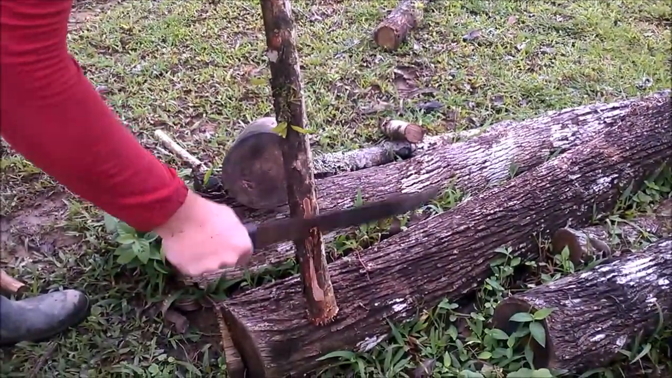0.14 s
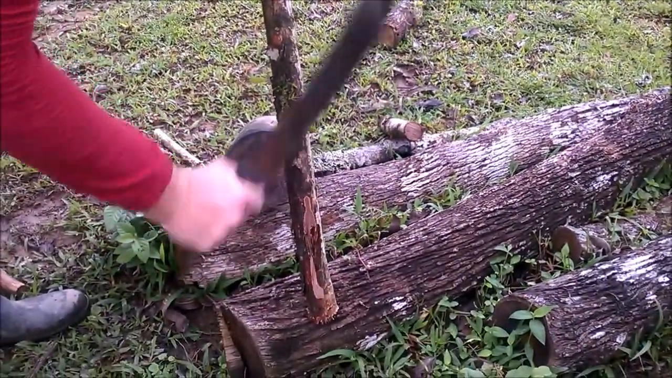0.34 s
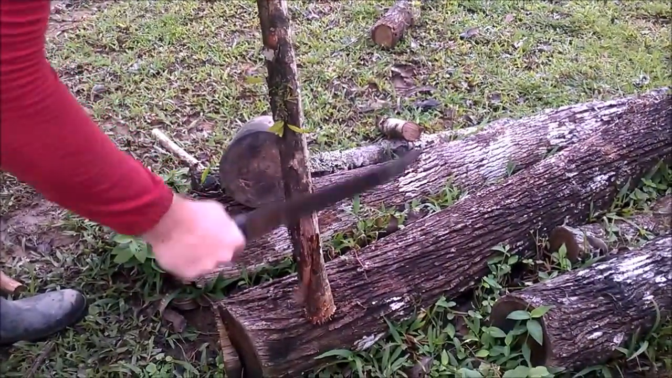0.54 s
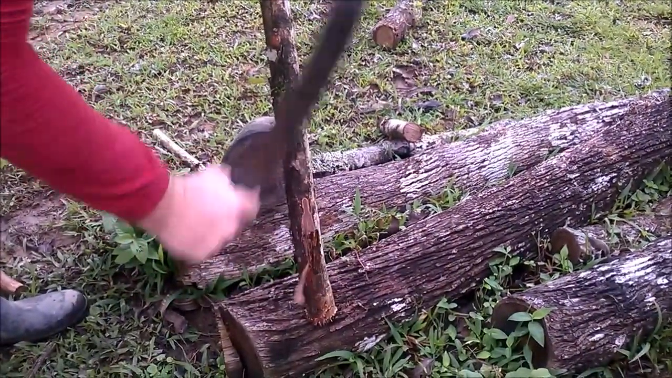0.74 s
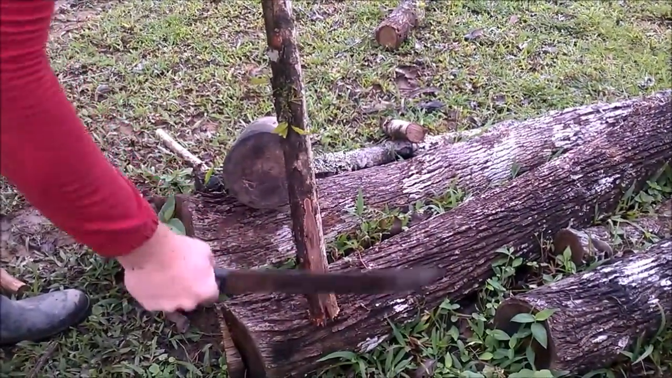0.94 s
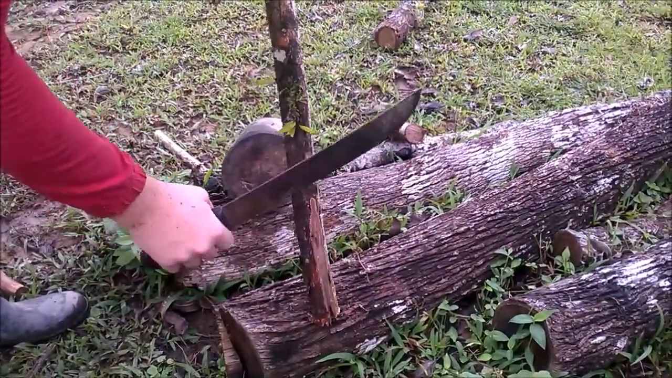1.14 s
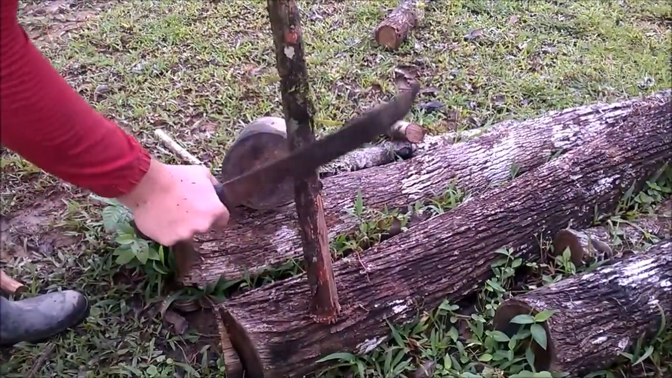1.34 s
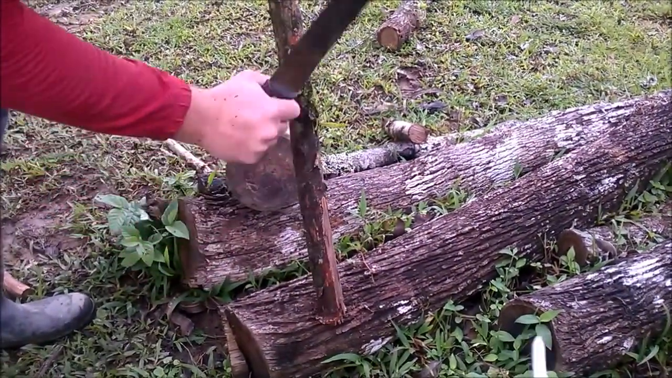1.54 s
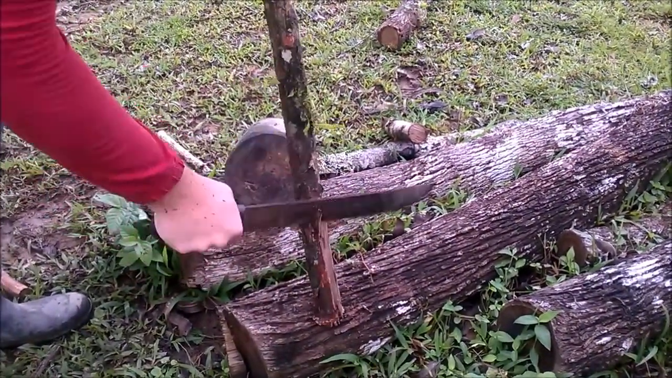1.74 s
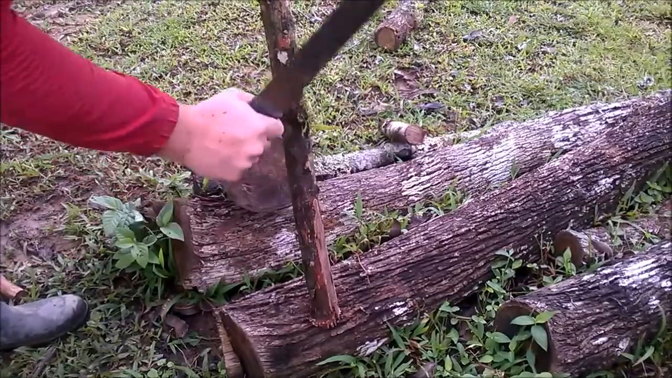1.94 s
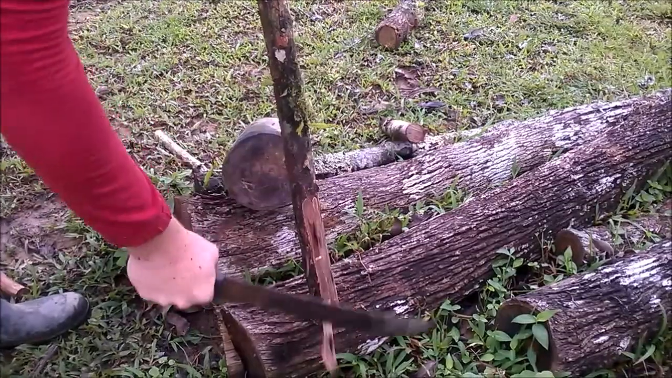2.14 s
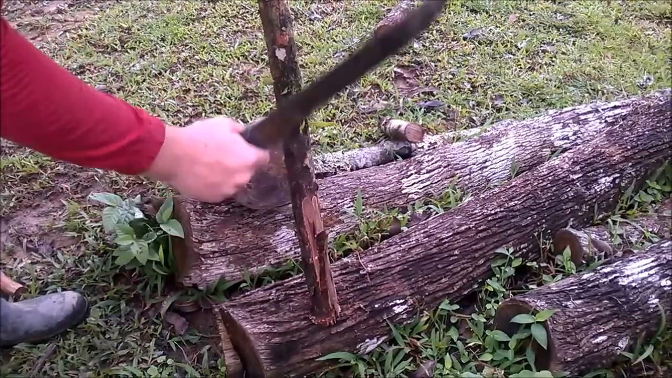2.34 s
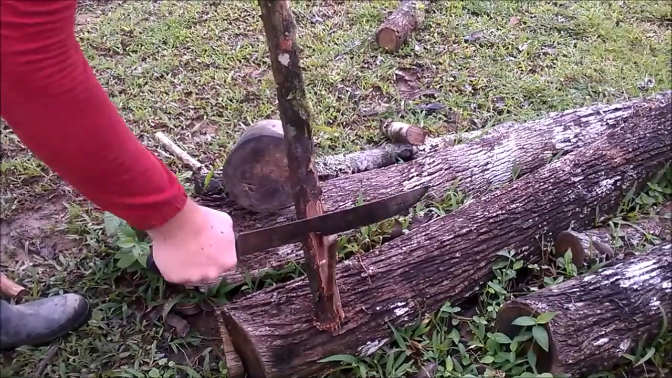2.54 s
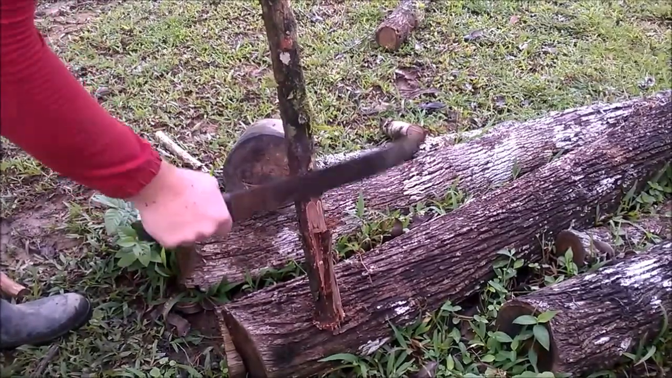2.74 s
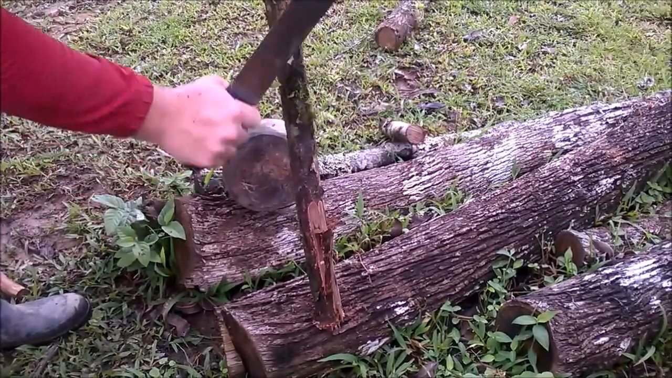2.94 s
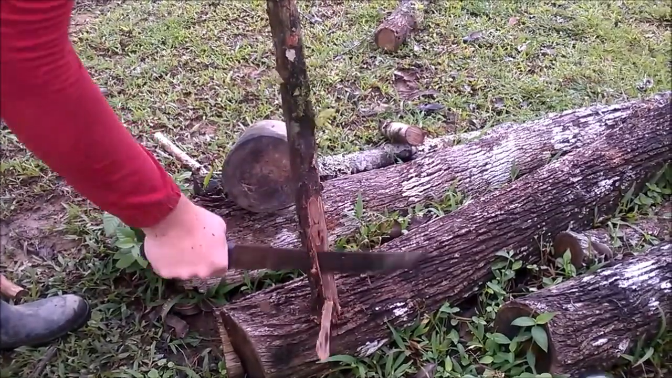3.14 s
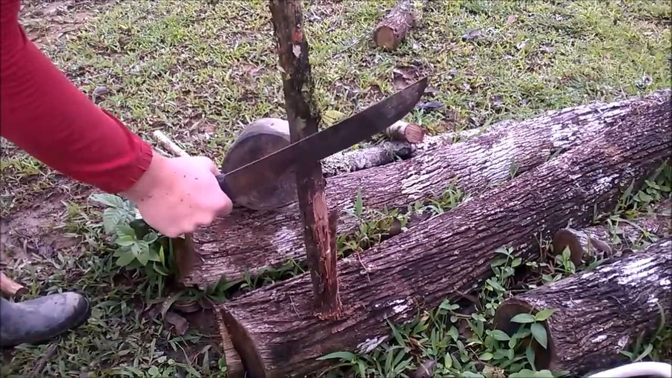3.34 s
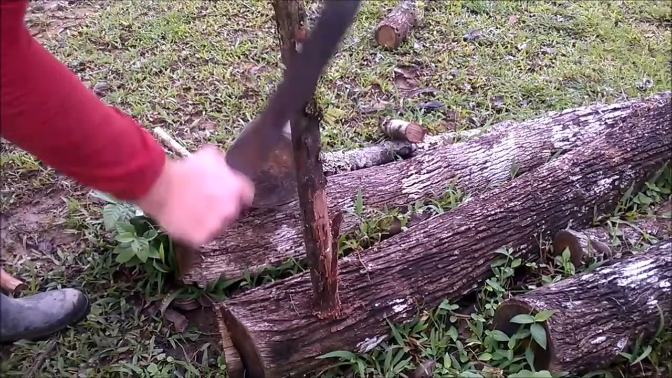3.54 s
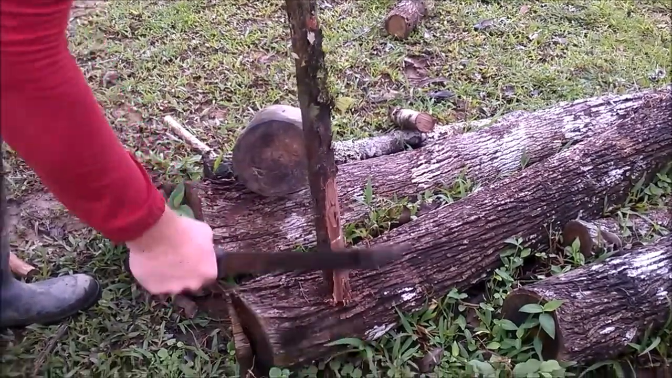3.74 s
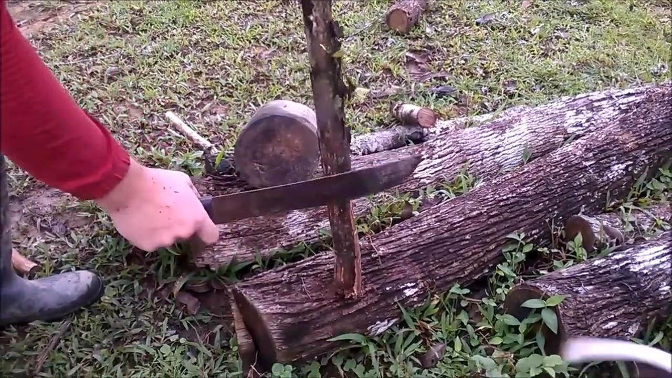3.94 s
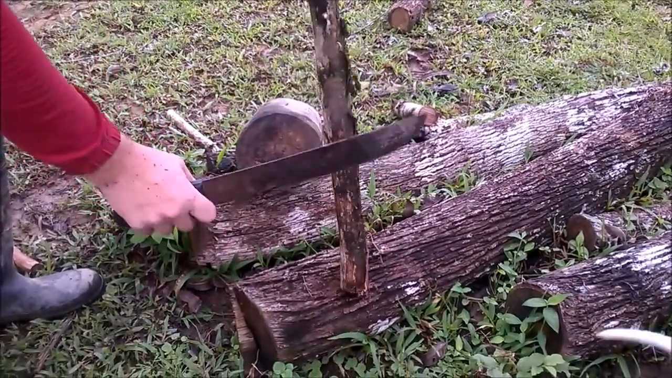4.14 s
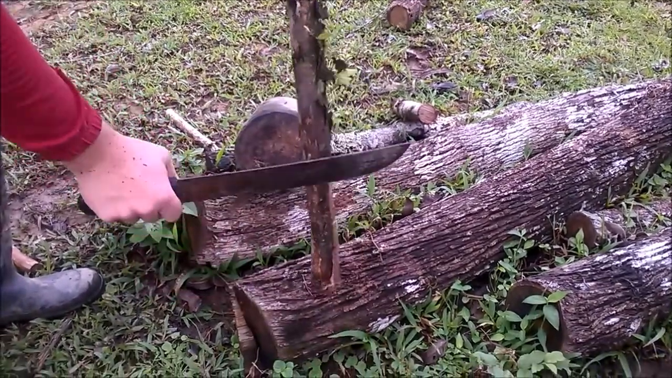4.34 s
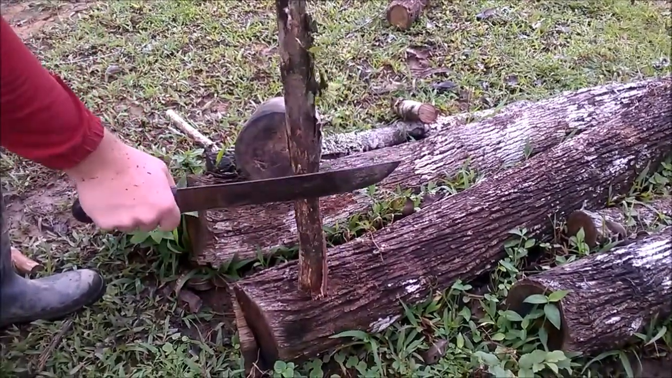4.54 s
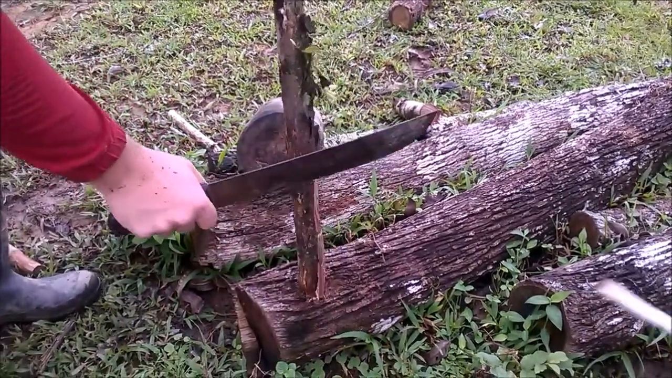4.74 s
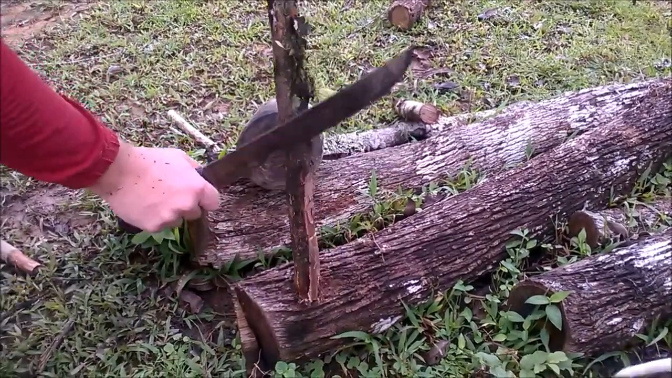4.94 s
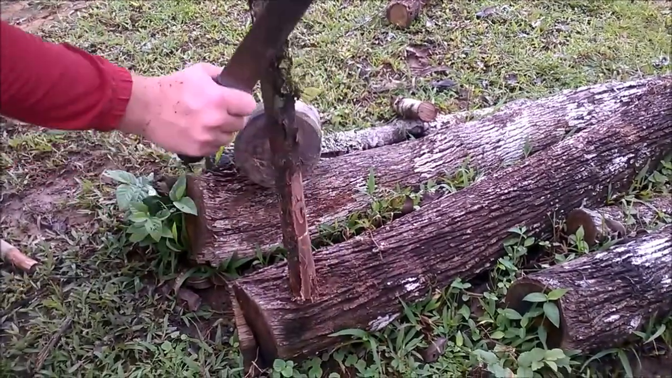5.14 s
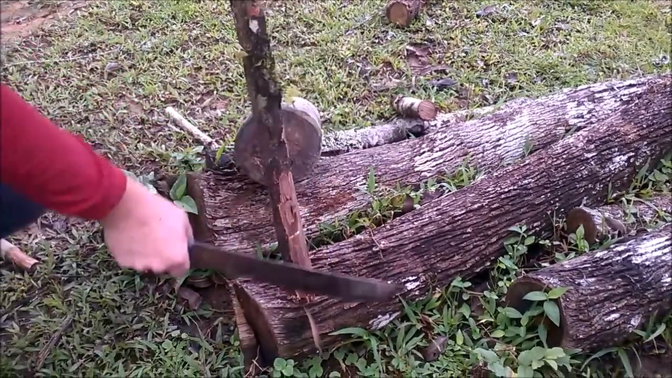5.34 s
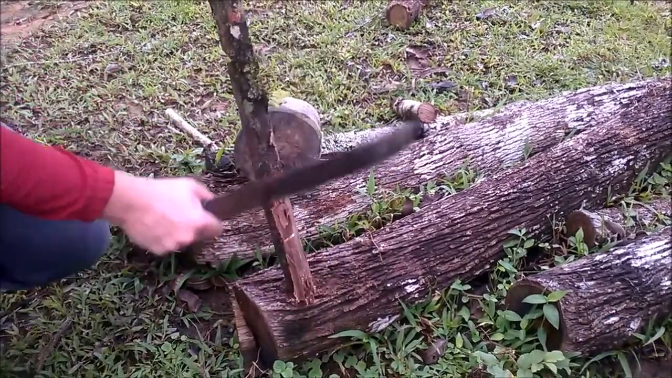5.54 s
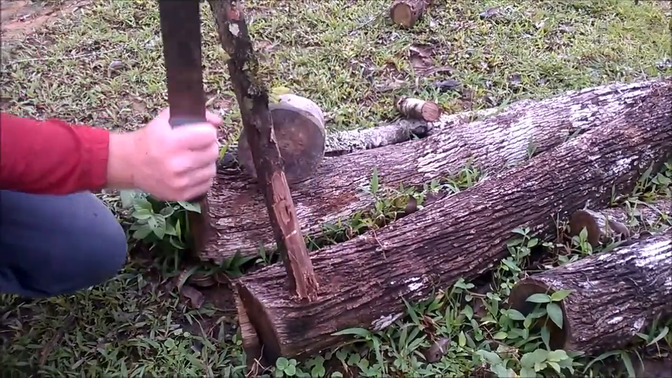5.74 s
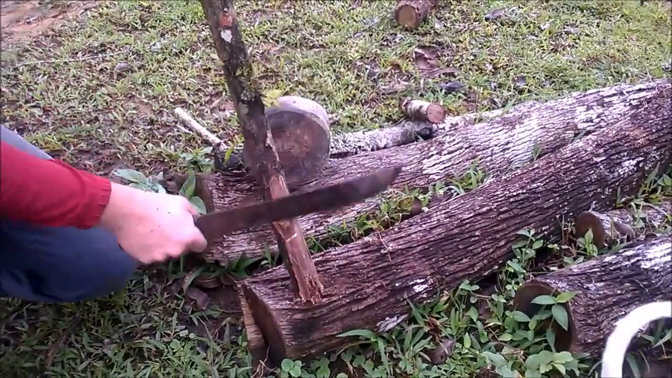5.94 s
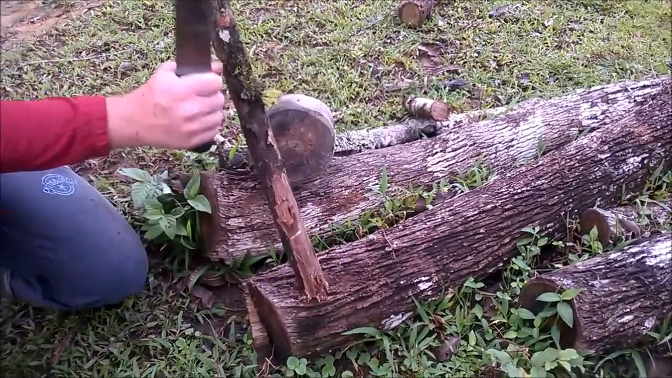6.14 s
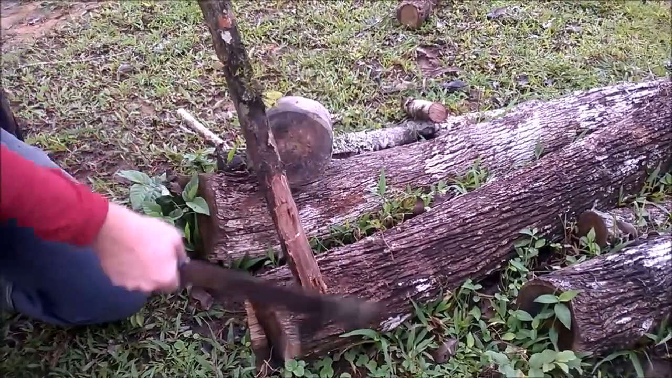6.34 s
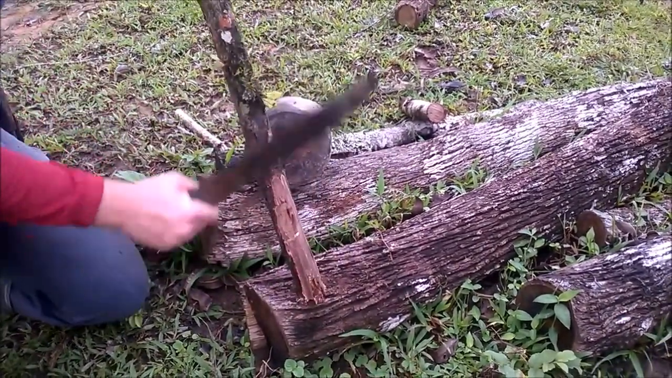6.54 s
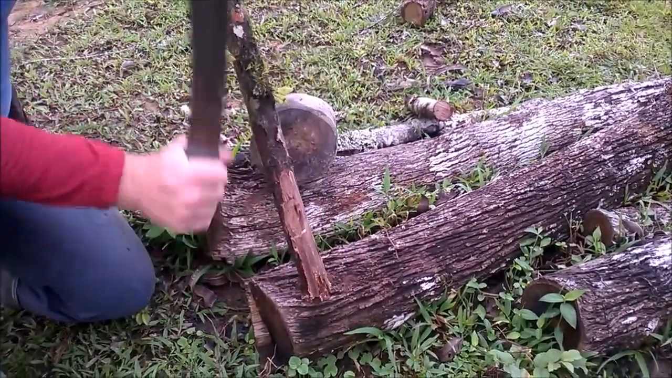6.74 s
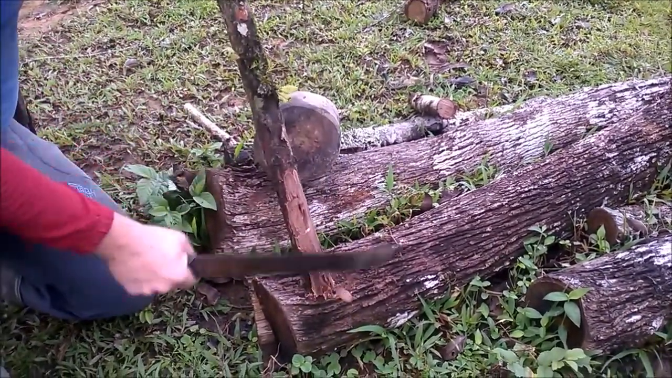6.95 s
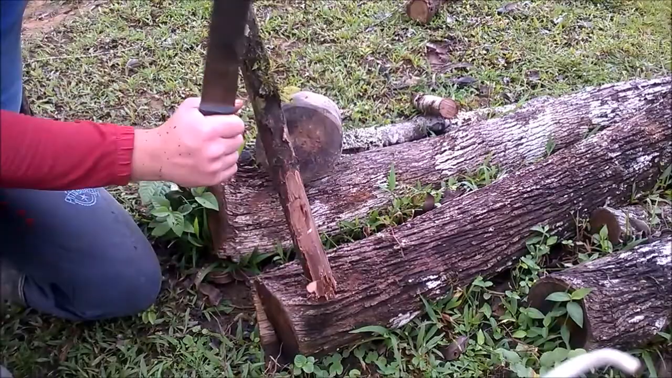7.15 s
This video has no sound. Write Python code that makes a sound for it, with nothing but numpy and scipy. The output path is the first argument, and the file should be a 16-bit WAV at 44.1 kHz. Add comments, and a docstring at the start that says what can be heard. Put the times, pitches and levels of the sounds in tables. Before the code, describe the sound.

Twelve bright, dry chops of a blade into green wood, each with a sharp crack, tearing fibres and a small low thud. Some leave a short high metallic ring. Midway the blows grow weaker and rougher, then stop while sleeves and grass rustle; strong chopping returns. Close outdoor sound with no room echo, slightly clipped peaks, soft insect hiss, faint whistles and low rumble.

```python
"""In a field, close to a small microphone, a machete chops a thin green pole held upright on a log.
Blows are noise bursts through wood and steel resonances, with snapping fibres and a low thud;
the freed blade rings as decaying sines, chips are small cracks, the pole's foot bumps with sagging sines.
Shaped noise makes the rustle of sleeves and grass, the faint whistles, the insects and the low far rumble."""
import sys
import numpy as np
from scipy import signal
from scipy.io import wavfile
from scipy.ndimage import uniform_filter1d

SR = 44100
rng = np.random.default_rng(int(sys.argv[2]) if len(sys.argv) > 2 else 0)


def put_to_file(sound):
    """Save the sound as 16-bit audio at rate SR, in the file named by the first command-line argument."""
    columns = np.atleast_2d(sound).T  # one column per channel
    safe = np.clip(columns, -1, 1)
    whole_steps = np.round(safe * 32767)
    wavfile.write(sys.argv[1], SR, whole_steps.astype(np.int16))


N = 317520  # samples, 7.2 s
GRID = np.fft.rfftfreq(4096, 1 / SR)  # Hz, frequencies at which filters are drawn

# Blows of the edge: start_s, level_db (loudest 2 ms, rms), blade_hz, wood_hz, wood_db, treble_db, low_db,
# thud_db, crack_t60_s, tear_db, knock_hz, knock_db, crumbs_db (per band)
BLOWS = [(0.1144, -8.5, 2820, 2040, 6, -3, -1.5, -37, 0.024, -19, 1160, 4, -64.5),
         (0.4677, -4.5, 3240, 2550, 5, -1, 2.5, -38.5, 0.024, -19, 1644, -2.5, -66.5),
         (0.8683, -4, 3660, 1627, 6, -1.5, 3, -34.5, 0.03, -18, 2540, 9, -72.5),
         (1.728, -16.5, 3100, 1160, 0, 3, 6.5, -38.5, 0.055, -17, 2000, 6.5, -81.5),
         (2.1153, -13.5, 3100, 2730, 15.5, -0.5, 2, -35.5, 0.035, -6.5, 1140, -2.5, -66.5),
         (2.568, -11, 3230, 2670, 13, 1, 9, -31.5, 0.011, -18, 1385, -2, -75),
         (3.1139, -11, 3070, 3212, 28, 0, 4, -40.5, 0.052, -9.5, 1650, 10.5, -64.5),
         (3.668, -19.5, 2780, 1652, 13, -10, -12, -31.5, 0.095, -13, 1142, 8.5, -63),
         (5.376, -15.5, 3160, 2350, 7.5, 0, 13.5, -38.5, 0.054, -19, 1110, 7.5, -57),
         (5.9318, -5.5, 3400, 3860, 10, -2.5, 6.5, -31, 0.038, -25.5, 1487, 14.5, -63),
         (6.3887, -6.5, 3230, 2720, -5, -0.5, 3, -33.5, 0.047, -12.5, 1660, -6.5, -65.5),
         (6.889, -4, 3800, 2590, 16, -4.5, 1, -32, 0.017, -16, 1593, 5.5, -60.5)]


def gain_of(db):
    """Decibels to amplitude."""
    return 10 ** (np.asarray(db) / 20)


def power_db(power):
    """Power to decibels."""
    return 10 * np.log10(power)


def evened(x):
    """Scales to rms 1."""
    return x / np.sqrt(np.mean(x ** 2) + 1e-20)


def peaked(x, db, span=88):
    """Scales a sound by the loudest span (in samples) of its first 2000, to the given rms level."""
    loudest_power = uniform_filter1d(x[:2000] ** 2, int(span)).max()
    return gain_of(db) * x / np.sqrt(loudest_power)


def read(points, hz):
    """Reads a (Hz, value) table on a log-frequency axis."""
    f, value = np.transpose(points)
    return np.interp(np.log(hz + 1), np.log(f + 1), value)


def add(mix, start_s, sound):
    """Mixes a sound in at its start time."""
    part = mix[round(start_s * SR):][:len(sound)]
    part += sound[:len(part)]


def tilt(hz, treble_db, low_db, low_hz=1900, high_hz=6500):
    """Shelves that raise or lower the top and the bottom, in dB."""
    treble = treble_db / (1 + (high_hz / (hz + 1)) ** 6)
    low = low_db / (1 + (hz / low_hz) ** 8)
    return treble + low


def modes(rows):
    """Power of a set of (Hz, width Hz, dB) resonances on the grid."""
    return sum(gain_of(db) ** 2 / (1 + (2 * (GRID - hz) / width) ** 2) ** 2 for hz, width, db in rows)


def coloured(x, db):
    """Filters causally (minimum phase) by a dB curve on the grid, so attacks keep their sharp front."""
    two_sided = np.r_[db, db[-2:0:-1]]
    log_gain = np.log(gain_of(np.maximum(two_sided, -100)))
    spectrum = np.exp(np.conj(signal.hilbert(log_gain)))
    taps = np.fft.ifft(spectrum).real[:2048]
    return signal.fftconvolve(x, taps)[:len(x)]


def noise(size, db_of, patchy_db, flicker_db):
    """Random short-time spectra with drifting patches and a flicker shared by all bands."""
    hop = size // 4
    frames, hz = N // hop + 5, np.fft.rfftfreq(size, 1 / SR)
    a, b, patches = rng.standard_normal((frames, len(hz), 3)).T
    patches = uniform_filter1d(patches, size // 64, 0)  # across frequency
    patches = evened(uniform_filter1d(patches, 12, 1))  # along time
    flicker = evened(uniform_filter1d(rng.standard_normal(frames), 3))
    frame_s = np.arange(frames) * hop / SR
    db = db_of(hz[:, None], frame_s[None]) + patchy_db * patches + flicker_db * flicker
    return signal.istft((a + 1j * b) * gain_of(db), nperseg=size, noverlap=size - hop)[1][:N]


def burst(t, t60, draw, rise=0.0001):
    """Noise with a quick rise (time constant in s) that dies away, 60 dB in t60."""
    return draw * (1 - np.exp(-t / rise)) * gain_of(-60 * t / t60)


def rumble():
    """Low far rumble: steady low noise that swells and sinks."""
    # colour of the rumble: pitch_hz, relative_db (per Hz)
    colour = [(9, -31.5), (16, -15.5), (32, -15), (48, -6), (65, -0.5), (82, -4.5), (110, -15),
              (135, -12.5), (170, -23), (300, -23), (600, -33.5), (1000, -75.5)]
    # its swells: time_s, level_db
    swells = [(0.0, -61.5), (1.32, -55), (1.52, -58), (1.96, -56), (2.87, -55.5), (3.13, -53.5),
              (3.63, -54.5), (3.87, -50), (4.03, -54), (4.95, -53.5), (5.69, -51.5), (7.2, -52)]
    steady = evened(noise(4096, lambda f, t: read(colour, f), 0.84, 0.42))
    s, db = np.transpose(swells)
    return steady * gain_of(np.interp(np.arange(N) / SR, s, db))


def field():
    """Insects and air around the microphone: noise whose bands drift."""
    # colour of insects and air: pitch_hz, relative_db (per Hz)
    colour = [(180, -35.5), (300, -3), (546, -20.5), (700, -10.5), (1970, -9.5), (3300, -6.5),
              (4600, -12.5), (5500, -5.5), (7200, -2.5), (7600, -15.5), (9500, -16), (12000, -16.5),
              (16000, -21.5)]
    level_db = -63  # rms
    return gain_of(level_db) * evened(noise(1024, lambda f, t: read(colour, f), 3.0, 0.2))


def whistles():
    """Thin, fuzzy tones: noise in a narrow gliding band."""
    # faint short whistles: start_s, length_s, start_hz, end_hz, level_db (rms before the fades)
    calls = [(0.36, .095, 3270, 2840, -53.5), (1.18, 0.24, 3680, 3600, -72), (2.25, .11, 5440, 5540, -58),
             (2.271, 0.13, 2690, 2730, -61.5), (6.04, 0.14, 5480, 5530, -63),
             (6.048, 0.11, 2700, 2650, -57.5), (6.199, 0.09, 4220, 4100, -59),
             (6.268, .045, 2710, 2700, -53), (6.31, 0.078, 4700, 4700, -59)]
    out = np.zeros(N)
    for s, length, start_hz, end_hz, db in calls:
        size = int(length * SR)
        a, b = uniform_filter1d(rng.standard_normal((2, SR // 4)), 300)[:, :size]
        turns = np.cumsum(np.linspace(start_hz, end_hz, size)) / SR
        wander = 0.074 + a + 1j * b  # a small steady part plus slow noise
        tone = evened((wander * np.exp(2j * np.pi * turns)).real)
        add(out, s, gain_of(db) * tone * signal.windows.tukey(size, .3))
    return out


def rustle():
    """Friction noise roughened by tiny catches: a swell for each movement, a fading trail after each blow."""
    # colour of cloth and grass rubbing: pitch_hz, relative_db (per Hz)
    rub = [(400, -20.5), (1100, -10.5), (2300, -11.5), (3150, -1.5), (3800, -6.5), (4600, -9.5), (5800, -4),
           (8500, -11), (12000, -7), (16000, -16)]
    # cloth and grass moving, one swell each: middle_s, half_length_s, level_db (per band), fine_hiss_db, low_scuff_db
    swells = [(0.405, 0.096, -62.5, -9, -5.5), (1.4, .06, -87, 9.5, -10), (1.844, 0.019, -80, 14, -14),
              (1.898, 0.026, -67, -20, -5), (2.105, 0.013, -69, -25, 5), (3.52, .08, -72, -8.5, -17.5),
              (4.22, 0.23, -71, -3.5, 4), (4.264, 0.045, -82, -20, 14), (4.553, 0.077, -77.5, -13, 11),
              (4.663, 0.077, -76, -3, 0), (4.884, 0.058, -60, -7, -5.5), (4.962, 0.08, -64, -4.5, -14),
              (5.089, .03, -61, -3.5, -0.5), (5.16, 0.054, -66.5, -11, -2), (5.269, 0.035, -58, -3.5, -2.5),
              (5.337, 0.027, -49.5, -9, -6), (5.58, 0.034, -48, -11.5, 0), (5.621, .015, -64, -20, 18),
              (5.803, 0.17, -71.5, -4, -5), (6.266, 0.13, -66, -12, -7.5), (6.713, 0.35, -71, -5.5, -1.5)]
    crumbs_t60_s, crumbs_fine_db, crumbs_low_db = 1.1, -4.5, -1.5  # bark and leaves settle after each blow

    def shape(f, t):
        """Level in dB at each frequency and time."""
        power = 1e-12
        for s, half, db, fine_db, low_db in swells:
            swell = gain_of(-6 * ((t - s) / half) ** 2) ** 2
            power = power + gain_of(db + tilt(f, fine_db, low_db)) ** 2 * swell
        trail = sum((t > s) * gain_of(db - 60 * abs(t - s) / crumbs_t60_s) ** 2 for s, *_, db in BLOWS)
        crumbs = trail * gain_of(tilt(f, crumbs_fine_db, crumbs_low_db)) ** 2
        return read(rub, f) + power_db(power + crumbs)

    catches = rng.exponential(1, N) * (rng.random(N) < 300 / SR)  # about 300 a second
    fade_s = .002  # time constant of each catch
    grain = 1 + .3 * signal.lfilter([1], [1, -np.exp(-1 / (fade_s * SR))], catches)
    return noise(512, shape, 1.0, 0.85) * grain


def bumps():
    """The pole's foot on the log: low knocks whose pitch sags, with a short wooden puff on top."""
    # bumps: start_s, level_db (sine before its soft rise), pitch_hz (after the sag)
    foot = [(0.117, -35, 69.4), (0.279, -28, 118.6), (0.315, -35, 88), (0.473, -38, 78.8),
            (0.89, -36, 51.1), (1.075, -40, 68), (1.733, -26, 62), (1.761, -36, 88.8), (2.138, -45, 102.7),
            (2.575, -25, 113), (3.701, -40.5, 99.6), (4.478, -31.5, 92.5), (5.95, -34.5, 62.5),
            (6.4, -31, 61.9), (6.572, -38, 88), (6.898, -27.5, 72.7)]
    t60_s = 0.096
    out, t = np.zeros(N), np.arange(SR // 4) / SR
    draws = rng.standard_normal((len(foot), len(t)))
    puff_db = power_db(modes([(316, 520, 0)]))
    for (s, db, hz), draw in zip(foot, draws):
        turns = hz * (t + 0.0023 * (1 - np.exp(-t / 0.004)))  # begins sharp, settles within ms
        soft_rise = 1 - np.exp(-t / 0.0038)
        add(out, s, gain_of(db - 60 * t / t60_s) * np.sin(2 * np.pi * turns) * soft_rise)
        puff = coloured(burst(t, 0.079, draw), puff_db)
        add(out, s, peaked(puff, db - 19.5))
    return out


def struck(tone_hz, tone_width, treble_db, low_db, tone_db, modes_db):
    """Spectrum of a blow in dB: broad crack, damped modes and a favoured tone."""
    # broad crack: pitch_hz, level_db (per Hz)
    crack = [(500, -29.5), (1200, -24.5), (2300, -17.5), (3300, -8), (4600, -8.5), (6500, -14),
             (10000, -11.5), (16000, -22.5)]
    # blade and pole while the edge is in the wood: pitch_hz, width_hz, level_db
    held = [(1126, 34, -23.5), (1683, 110, -21.5), (2390, 280, -8.5), (2750, 220, -2.5), (3185, 270, -1),
            (3720, 37, -13.5), (3970, 310, -7), (5807, 470, -5.5), (6360, 320, -7.5), (6924, 200, -4.5),
            (7900, 80, -10), (9200, 1700, -12)]
    # each spot wakes the modes unevenly, by about 3 dB
    woken = np.array(held) + [0, 0, 3.0] * rng.standard_normal((len(held), 1))
    power = gain_of(read(crack, GRID)) ** 2
    power = power + gain_of(modes_db) ** 2 * modes(woken)
    power = power + modes([(tone_hz, tone_width, tone_db)])
    return power_db(power) + tilt(GRID, treble_db, low_db)


def ticks():
    """Rebounds, splinters and chips landing: small versions of the crack, with a softer front."""
    # ticks: start_s, level_db (loudest 2 ms, rms), pitch_hz, brightness_db, t60_s
    chips = [(0.5748, -39.5, 2660, 8, 0.083), (0.781, -54.5, 2400, -10, 0.099),
             (0.8881, -26.5, 2970, 2.5, 0.017), (0.9732, -51.5, 3280, 11, 0.068),
             (1.075, -51.5, 2410, -27, 0.2), (1.53, -52.5, 2890, -8, 0.05),
             (1.87, -48.5, 2960, -13.5, 0.059), (2.1291, -26, 3840, 9, 0.09), (2.1423, -27, 3070, 20, 0.07),
             (2.172, -25.5, 2680, -5.5, 0.018), (2.202, -35.5, 3450, -2.5, 0.021),
             (2.5689, -7.5, 3500, 3, 0.014), (2.5736, -17.5, 2680, -6.5, 0.025),
             (3.122, -14, 3270, -4.5, 0.027), (3.1288, -19, 3940, 6.5, 0.065),
             (3.1415, -23, 4130, 1.5, 0.024), (3.181, -38.5, 3200, -18, 0.096),
             (3.22, -42.5, 3300, 1.5, 0.076), (3.326, -53, 3670, -1, 0.019),
             (3.674, -23.5, 2800, 5.5, 0.11), (3.6866, -18.5, 3410, 1.5, 0.046),
             (3.7025, -31.5, 3570, -5, 0.015), (3.713, -40.5, 3970, 5, .03),
             (3.7452, -32, 3920, 8.5, 0.036), (3.7987, -45, 3590, 8, 0.044),
             (4.4758, -49, 2780, -27, 0.024), (5.2421, -46, 2900, 3, 0.023),
             (6.117, -50.5, 1420, -19, 0.073), (6.279, -50.5, 2770, 11, 0.015),
             (6.4324, -39.5, 4340, -20, 0.034), (6.573, -37.5, 2900, -1.5, 0.029),
             (6.871, -34.5, 2500, -5, 0.021), (6.934, -37, 2810, -4, 0.099),
             (6.9569, -34.5, 2900, -8, 0.05)]
    out, t = np.zeros(N), np.arange(SR // 8) / SR
    draws = rng.standard_normal((len(chips), len(t)))
    for (s, db, hz, treble_db, t60), draw in zip(chips, draws):
        knock_db = 11 - 0.5 * treble_db  # the duller a tick, the more knock
        spectrum = struck(hz, 470, treble_db, knock_db, 1.5, 0.0)
        tick = coloured(burst(t, t60, draw, rise=0.00073), spectrum)
        add(out, s, peaked(tick, db))
    return out


def blade():
    """Three steel modes swell as the wood lets go, and fade fast once the blade is damped."""
    # the blade comes free: start_s, level_db (first tone), upper_tone_db, lower_tone_db, damped_after_s
    releases = [(.12, -47, 12, -20, 0.016), (.475, -44, 7, -22, 0.071), (0.881, -57.5, 15, 5.5, 0.062),
                (1.74, -55, -4, -14, 0.084), (2.154, -30, -5, -22.5, 0.23), (2.579, -53, -2, -4.5, 0.041),
                (3.184, -40, -3, -28, 0.22), (3.70, -37.5, 3.5, -27, 0.02), (3.749, -45.5, -2, -34, 0.11),
                (5.383, -29, -12, -29, 0.096), (5.948, -50.5, -3, -0.5, 0.3),
                (6.395, -28.5, -20, -25, 0.084), (6.908, -30, -1.5, -30, 0.13)]
    # modes of the free blade: pitch_hz, t60_s
    steel = [(5780, .38), (6492, .26), (2710, .7)]
    out, t = np.zeros(N), np.arange(SR // 2) / SR
    for s, db, upper_db, lower_db, length in releases:
        drift = uniform_filter1d(rng.standard_normal((3, len(t))), 700)
        sway = gain_of(2.9 * evened(drift))  # the blade turns in the air
        tones = sum(g * gain_of(d - 60 * t / t60) * np.sin(2 * np.pi * hz * t)
                    for (hz, t60), d, g in zip(steel, (0, upper_db, lower_db), sway))
        damping = gain_of(-170 * np.maximum(t - length, 0))  # 170 dB a second
        add(out, s, gain_of(db) * tones * (1 - np.exp(-t / 0.0013)) * damping)
    return out


def chops():
    """The edge bites: a crack, fibres tearing in uneven snaps, and the pole's thud."""
    # fibres tearing: pitch_hz, level_db (per Hz)
    fibres = [(400, -30), (1000, -20.5), (2000, -12), (3000, -7.5), (4800, -12.5), (6300, -8.5),
              (9500, -13.5), (16000, -26.5)]
    # modes of the thudding pole: multiple (of the thud pitch), width_hz, level_db
    pole = [(1, 120, 4), (1.45, 220, -8.5), (.45, 180, -4), (2.3, 200, -26)]
    thud_hz, thud_t60_s, tear_t60_s = 278, 0.16, 0.15
    thud_spectrum = power_db(modes([(k * thud_hz, width, level) for k, width, level in pole]))
    out, t = np.zeros(N), np.arange(SR // 3) / SR
    for (s, db, blade_hz, wood_hz, wood_db, treble_db, low_db, thud_db, t60, tear_db,
         knock_hz, knock_db, _) in BLOWS:
        crack_draw, tear_draw, snap_draw, thud_draw = rng.standard_normal((4, len(t)))
        edge = (t < .00005) * 2.39  # the first contact is one sharp spike
        crack = coloured(edge + burst(t, t60, crack_draw), struck(blade_hz, 500, treble_db, low_db, 3.1, 1.9))
        snaps = gain_of(4.5 * evened(uniform_filter1d(snap_draw, 30)))
        tear_spectrum = read(fibres, GRID) + tilt(GRID, treble_db, low_db) + tear_db
        tear = coloured(burst(t, tear_t60_s, tear_draw) * snaps, tear_spectrum)
        # lingering wood tone and hollow knock, from the crack's own noise
        wood_spectrum = power_db(modes([(wood_hz, 90, wood_db), (knock_hz, 70, knock_db)]))
        wood = coloured(burst(t, .3 * t60, crack_draw), wood_spectrum)
        add(out, s, peaked(crack + tear + wood, db))
        thud = coloured(burst(t, thud_t60_s, thud_draw), thud_spectrum)
        add(out, s, peaked(thud, thud_db, span=160))
    return out


def scene():
    """All sources, from the far rumble to the blows, as one channel."""
    background = rumble() + field() + whistles() + rustle()
    return (background + bumps() + ticks() + blade() + chops())[None]


def record(dry):
    """The microphone's chain: peaks clip just under full scale, then a steep low-pass limits the band."""
    edge_hz = 16050
    clipped = np.clip(dry, -.95, .95)
    low_pass = signal.firwin(511, edge_hz, window=("kaiser", 9), fs=SR)
    return signal.oaconvolve(clipped, low_pass[None], "same")


dry = scene()
out = record(dry)
put_to_file(out)
```